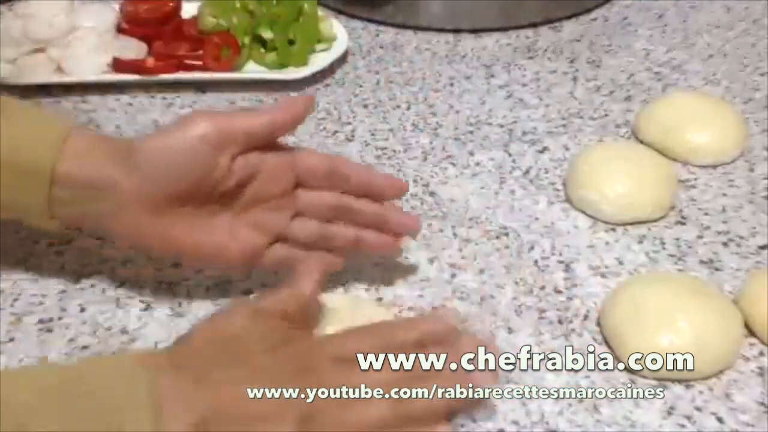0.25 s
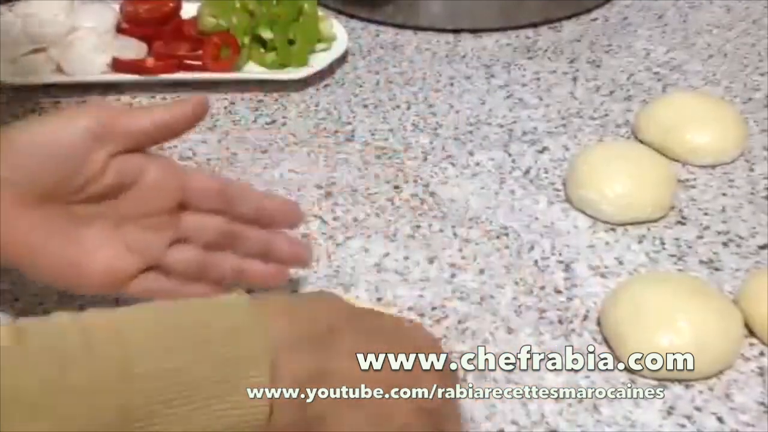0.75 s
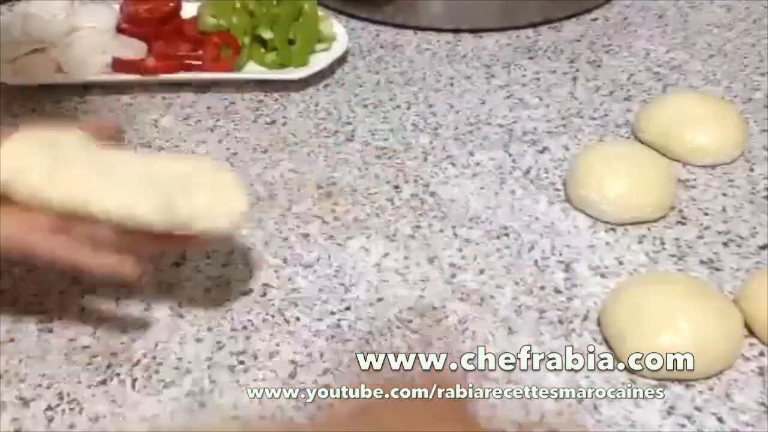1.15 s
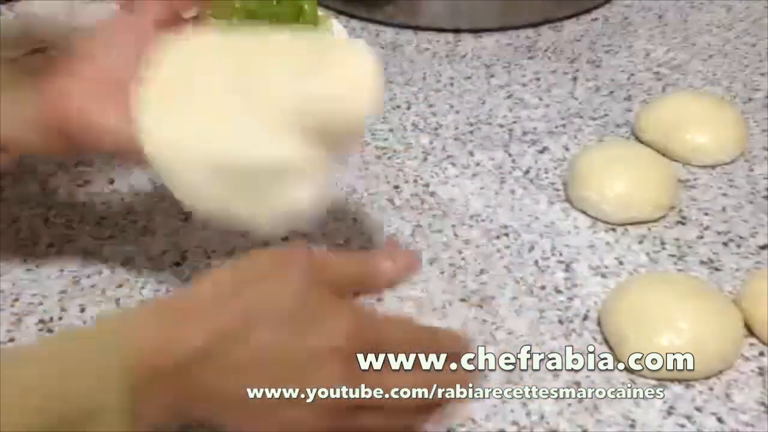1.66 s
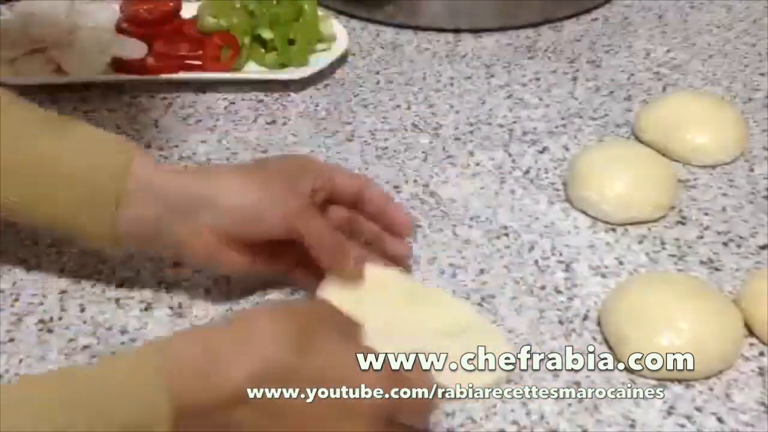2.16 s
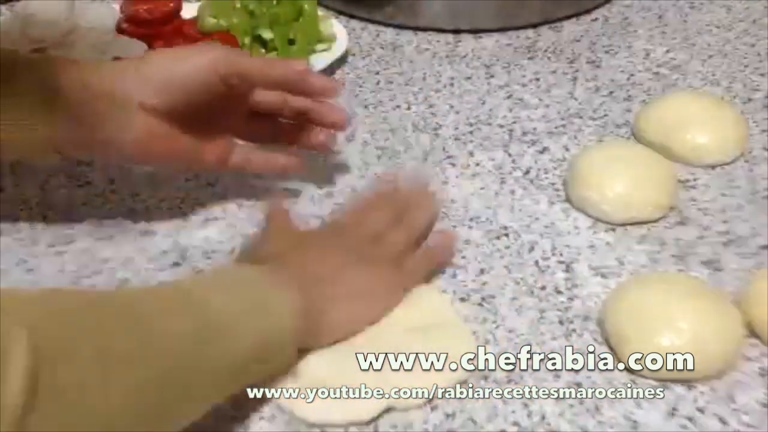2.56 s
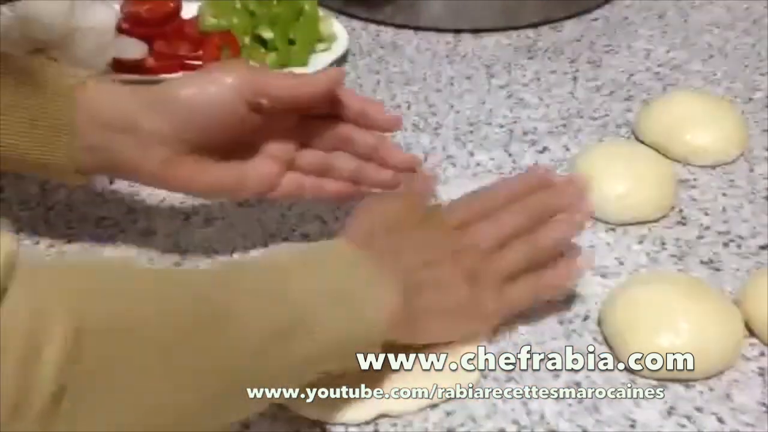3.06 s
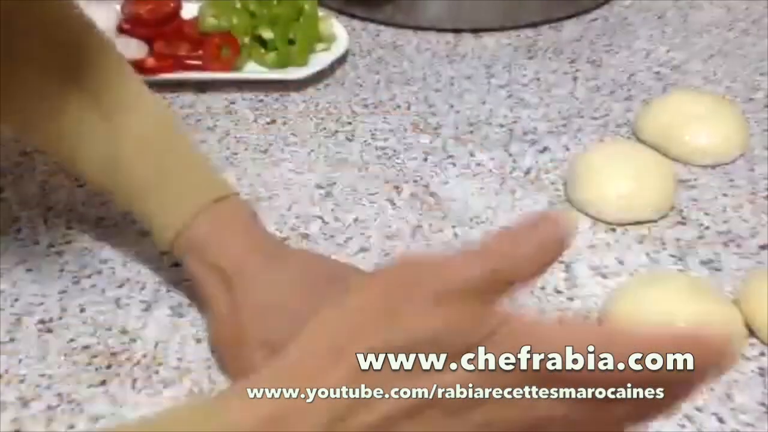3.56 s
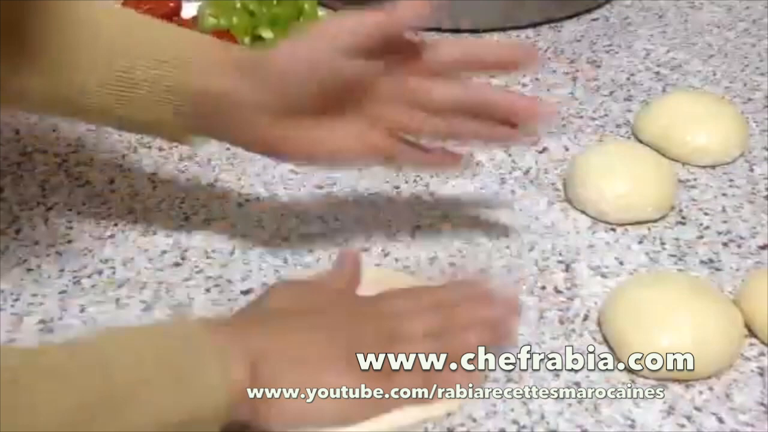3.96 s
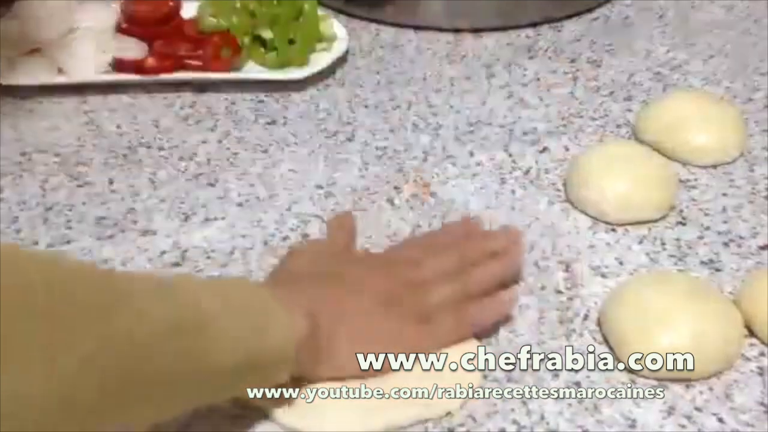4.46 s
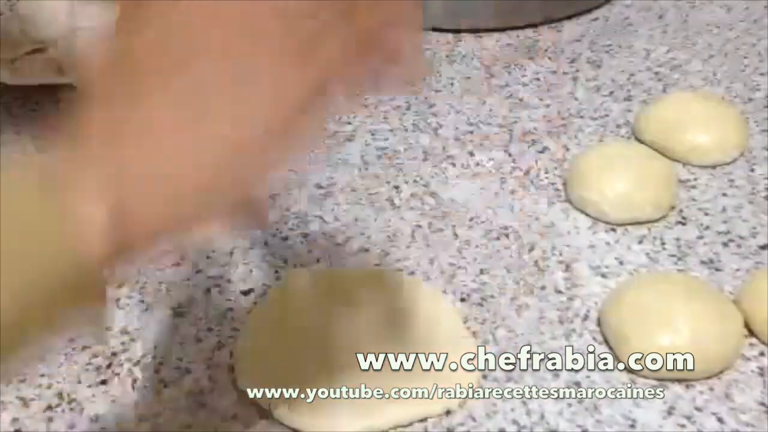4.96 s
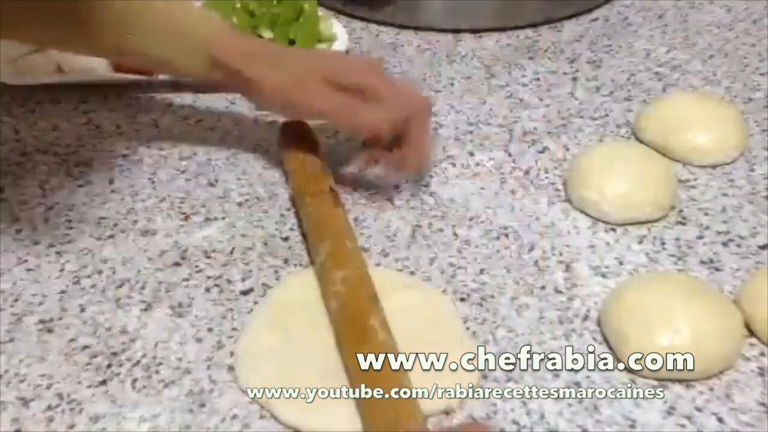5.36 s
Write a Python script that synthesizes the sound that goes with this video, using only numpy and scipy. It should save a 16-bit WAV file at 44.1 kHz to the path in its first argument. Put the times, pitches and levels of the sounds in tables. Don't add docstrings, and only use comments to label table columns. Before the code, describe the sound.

Bare hands work dough on a stone counter: a few fleshy pats, one sharp crack, then dry floury hissing during a toss. Quick light claps lead into four steady flat slaps with sticky snaps, a brief lull, and two hardest blows that overload the close microphone. A dish rings faintly; low wood scuffs and rubbing finish over quiet room hiss.

```python
import sys
import numpy as np
from scipy import signal
from scipy.fft import rfft, irfft, next_fast_len
from scipy.io import wavfile
from scipy.ndimage import map_coordinates

SR = 44100
rng = np.random.default_rng(int(sys.argv[2]) if len(sys.argv) > 2 else 0)


def amplitude_ratio(level_db):
    exponent = np.asarray(level_db, float) / 20
    return 10 ** exponent


def master_out(mix):
    frames = np.transpose(np.atleast_2d(mix))
    ceiling = np.clip(frames, -1, 1)
    pcm = np.round(ceiling * 32767).astype(np.int16)
    wavfile.write(sys.argv[1], SR, pcm)


N = 246848


def unit(x):
    return x / np.sqrt(np.mean(x ** 2) + 1e-20)


def along(points, hz):
    f, v = np.transpose(points)
    return np.interp(np.log(hz + 1), np.log(f + 1), v)


def filtered(x, response):
    m = next_fast_len(len(x) + 8192)
    return irfft(rfft(x, m) * response(np.fft.rfftfreq(m, 1 / SR)), m)[:len(x)]


def resonance(f, hz, width):
    return 1j * f * width / (hz * hz - f * f + 1j * f * width)


def wobble(rate):
    knots = rng.standard_normal(int(N * rate / SR) + 4)
    return map_coordinates(knots, [np.arange(N) * rate / SR])


def hiss(spectrum):
    return unit(filtered(rng.standard_normal(N), lambda f: amplitude_ratio(along(spectrum, f))))


def ring(modes, t, scatter_db):
    out = np.zeros(len(t))
    for hz, db, t60 in modes:
        level = db + scatter_db * rng.normal()
        out += amplitude_ratio(level - 60 * t / t60) * np.sin(2 * np.pi * hz * t)
    return out


def burst(colour, shape):
    puff = shape * unit(filtered(rng.standard_normal(len(shape)), colour))
    click = filtered(np.arange(len(shape)) == 0, colour)
    return puff, click * np.linalg.norm(shape) / np.linalg.norm(click)


def swells(rows, extra_db=0):
    s, db, rise, fall = np.transpose(rows)[:4, :, None]
    t = np.arange(0, N + 64, 64) / SR
    away = np.abs(t - s) / np.where(t < s, rise, fall)
    gain = amplitude_ratio(db + np.reshape(extra_db, (-1, 1)) - 36.5 * away ** 1.64).sum(axis=0)
    return np.interp(np.arange(N) / SR, t, gain)


# pitch in Hz, time to fall 60 dB in seconds.
KITCHEN_DECAY = [(100, 0.7), (300, 0.47), (800, 0.44), (2000, 0.54), (5000, 0.43), (12000, 0.39)]
# pitch in Hz, level in dB.
WALL_COLOUR = [(60, -9), (110, -3.5), (400, -2), (1500, 3.5), (5000, 1.5), (14000, 0.5)]


def echo():
    hz, t, z = signal.stft(rng.standard_normal(SR), SR, nperseg=512)
    t60 = along(KITCHEN_DECAY, hz)[:, None]
    colour_db = along(WALL_COLOUR, hz) + 3 * rng.standard_normal(len(hz))
    kitchen = amplitude_ratio(-60 * t / t60)
    next_room = amplitude_ratio(-27.5 - 60 * t / (3.74 * t60))
    gain = amplitude_ratio(colour_db[:, None]) * (kitchen + next_room)
    tail = signal.istft(z * gain, SR, nperseg=512)[1]
    t = np.arange(len(tail)) / SR
    flutter = amplitude_ratio(3.4 * np.cos(2 * np.pi * t / 0.0204) * np.exp(-t / 0.04))
    build = np.clip(t / 0.0017 - 0.3, 0, 1)
    tail = tail * flutter * build
    return tail / np.linalg.norm(tail)


def add(out, s, hit, wet_db, source=None):
    sound = amplitude_ratio(wet_db) * signal.fftconvolve(hit if source is None else source, echo())
    sound[:len(hit)] += hit
    part = out[round(s * SR):][:len(sound)]
    part += sound[:len(part)]


# pitch in Hz, level in dB per Hz.
ROOM_COLOUR = [(40, -42), (80, -22), (110, -2), (200, 0), (530, -5.5), (820, -7.5), (1660, -11.5),
               (7400, -16), (16000, -20)]


def room_hiss():
    return amplitude_ratio(-54.3) * hiss(ROOM_COLOUR)


# pitch in Hz, width in Hz, level in dB.
STANDING_WAVES = [(395, 4.5, -7.5), (514, 40, -0.5), (592, 15, 7.5), (683, 150, 1), (844, 19, -4),
                  (1170, 89, -2.5)]
# pitch in Hz, level in dB, time to fall 60 dB in seconds.
CABINET_MODES = [(62.1, -2.5, 0.25), (80, 23, 0.044), (106.3, 9, 0.48)]
# pitch in Hz, level in dB, time to fall 60 dB in seconds.
SLAB_MODES = [(149, 8, 0.52), (194, 4.5, 0.15), (242, -8.5, 0.58), (283.5, -6.5, 0.47)]


def standing_waves(f):
    return 1 + sum(amplitude_ratio(db) * resonance(f, hz, width) for hz, width, db in STANDING_WAVES)


def thud(out, s, db, hz, smack_db, cabinet_db, slab_db):
    t, long = np.arange(SR // 10) / SR, np.arange(SR * 3 // 4) / SR
    rise = 1 - np.exp(-t / 0.00069)
    fade_db = 60 * (t * hz / 9) ** 1.51
    pocket = -rise * np.sin(2 * np.pi * hz * t) * amplitude_ratio(db + 3 - fade_db)
    smack = rise * amplitude_ratio(smack_db + 6.5 - 60 * t / 0.037)
    puff, click = burst(lambda f: resonance(f, 397, 687) ** 2, smack)
    add(out, s, pocket + puff, wet_db=-1.5, source=pocket + filtered(click, standing_waves))
    boom = amplitude_ratio(cabinet_db) * ring(CABINET_MODES, long, scatter_db=-1.5)
    boom += amplitude_ratio(slab_db) * ring(SLAB_MODES, long, scatter_db=3.5)
    part = out[round(s * SR):][:len(long)]
    part += (boom * (1 - np.exp(-long / 0.0068)))[:len(part)]


# start in seconds, thud peak in dB, air pocket in Hz, smack in dB, boom in dB.
PALM_PATS = [(0.0, -46.5, 234, -47.5, -59.5), (0.147, -27.5, 323, -31, -38),
             (0.414, -13, 294, -24.5, -40.5), (0.652, -14, 271, -32.5, -44.5),
             (0.898, -44, 278, -50.5, -71), (1.233, -35, 256, -46, -50), (1.462, -28, 250, -33.5, -35),
             (1.87, -31.5, 317, -40.5, -68), (1.891, -29.5, 292, -32, -51), (1.916, -27, 304, -31.5, -48.5),
             (2.039, -34.5, 242, -66, -62.5), (3.524, -36, 193, -33, -38), (3.779, -51, 197, -54, -84),
             (5.312, -60, 242, -48.5, -48), (5.578, -73, 209, -76, -68)]


def palm_pats():
    out = np.zeros(N)
    for s, db, hz, smack_db, boom_db in PALM_PATS:
        thud(out, s, db, hz, smack_db, boom_db, boom_db + 1)
    return out


# pitch in Hz, level in dB.
DULL_RUB = [(500, -24.5), (1200, -16), (3000, -8.5), (5500, -13.5), (9000, -15.5), (16000, -32.5)]
BRIGHT_RUB = [(2500, -25), (5000, -3), (7500, -3.5), (11000, -7.5), (16000, -7)]
# peak time in seconds, level in dB, rise in seconds,
# fall in seconds, brightness in dB of the top over the middle.
STROKES = [(0.0, -52, .05, .12, -8), (.084, -53.5, .05, 0.036, 1.5), (.135, -52, .03, .1, 1.5),
           (.366, -59, .1, 0.014, 10.5), (.676, -54.5, .025, 0.074, 18), (.74, -57.5, .15, 0.48, 9.5),
           (1.0, -42, .17, 0.25, -7.5), (1.25, -47.5, 0.015, .13, 10), (1.313, -33, 0.1, 0.2, 6),
           (1.472, -46.5, 0.02, 0.23, 6), (1.569, -32, .17, 0.27, 5), (1.87, -54, .2, 0.46, 8),
           (2.012, -68, .15, 0.42, 9.5), (2.1, -58, .08, 0.18, 8.5), (2.189, -50, .05, 0.28, 2.5),
           (2.32, -52, .04, 0.21, 12), (2.39, -63, .08, 0.11, 9), (3.358, -56.5, .1, .15, 2),
           (3.56, -68, .06, 0.39, 8), (3.788, -50.5, .15, .16, -5.5), (4.6, -49.5, .4, 0.065, -1.5),
           (4.96, -63, .07, 0.25, 7), (5.1, -51, .25, 0.23, -10), (5.268, -57, .12, .13, -8)]


def rubs():
    brightness_db = np.transpose(STROKES)[-1]
    dull = amplitude_ratio(-5) * swells(STROKES) * hiss(DULL_RUB)
    bright = amplitude_ratio(-4) * swells(STROKES, brightness_db) * hiss(BRIGHT_RUB)
    grain = amplitude_ratio(0.84 * wobble(54) + 0.75 * wobble(400))
    return grain * (dull + bright)


def slap(out, s, db, hz, width, length, wet_db):
    t = np.arange(SR // 20) / SR
    shape = amplitude_ratio(db - 4) * (1 - np.exp(-t / 0.00046)) * np.exp(-t / max(length, 5e-4) * 2)
    crack, click = burst(lambda f: 0.034 * resonance(f, 4100, 14000) + resonance(f, hz, width) ** 2, shape)
    snap = np.exp(-(length / 0.0025) ** 2)
    add(out, s, snap * click + (1 - snap) * crack, wet_db, source=click)


# start in seconds, peak in dB, centre in Hz, length in seconds.
TOUCHES = [(0.143, -37.5, 5970, .0074), (0.149, -29.5, 8400, .0054), (.401, -31.5, 3700, .012),
           (0.649, -21.5, 6500, .0027), (1.232, -26.5, 6200, .004), (1.458, -26, 6200, .006),
           (1.892, -28.5, 12100, .011), (2.296, -34, 4000, .006), (2.5847, -20.5, 4000, .006),
           (2.594, -12.5, 5900, .003), (2.89, -17.5, 4630, .003), (2.897, -21.5, 6000, .006),
           (3.1713, -24, 7000, .005), (3.176, -20, 7100, .002), (3.525, -21.5, 2780, .005),
           (3.526, -34, 11400, .01), (4.0035, -17, 3480, .008), (4.393, -22, 1970, .008),
           (4.396, -15, 4040, .004), (5.015, -35.5, 10630, .006)]


def touches():
    out = np.zeros(N)
    for s, db, hz, length in TOUCHES:
        slap(out, s, db, hz, 8700, length, wet_db=2)
    return out


# start in seconds, peak in dB, centre in Hz, length in seconds, echo in dB.
CRACKS = [(0.147, -24.5, 2390, 0.0041, 3), (0.413, -5.5, 3730, 0.0021, -5),
          (1.89, -12.5, 3550, 0.0011, 0.5), (1.9173, -17.5, 5370, .004, -4.5),
          (2.305, -17.5, 4000, 0.0028, -3.5), (2.587, -9, 1980, 0.0075, -3),
          (2.895, -19.5, 1400, 0.0057, 0), (3.168, -17, 1300, 0.0031, 0.5), (4.006, -0.5, 2560, 0.0032, 0),
          (4.397, 4, 2180, 0.0018, -15), (5.314, -34, 1000, .004, -13)]


def cracks():
    out = np.zeros(N)
    for s, db, hz, length, wet_db in CRACKS:
        slap(out, s, db, hz, 2960, length, wet_db)
    return out


# start in seconds, peak in dB, pitch in Hz, echo in dB.
POPS = [(.1503, -28, 530, 9), (0.4152, -29.5, 475, 10.5), (0.4158, -28.5, 640, 7), (1.4602, -29, 780, 3),
        (1.9182, -24, 950, -1), (2.5886, -14.5, 2330, -10), (2.5962, -8, 414, -3.5),
        (2.8961, -15.5, 2140, 3.5), (2.9203, -13.5, 870, -5.5), (3.1714, -15, 2150, 1.5),
        (3.1976, -16, 910, -9), (4.0076, -6.5, 1620, -6.5), (4.0092, -8.5, 620, 6), (4.4003, -17, 480, 4),
        (5.0162, -37.5, 750, -3)]


def pops():
    out = np.zeros(N)
    for s, db, hz, wet_db in POPS:
        slap(out, s, db, hz, 0.35 * hz, 7.1 / hz, wet_db)
    return out


# start in seconds, thud peak in dB, air pocket in Hz, heel in dB, boom in dB.
FLAT_PATS = [
    (2.3, -30, 284, -30.5, -53.5),
    (2.593, -9.5, 289, -10.5, -29.5),
    (2.9, -14.5, 324, -14.5, -30.5),
    (3.175, -18.5, 328, -17.5, -31.5),
    (4.007, 2.1, 301, -6.5, -29.5),
    (4.399, -4, 267.5, -15.5, -29.5),
]


def flat_pats():
    out, heel_delay_s = np.zeros(N), 0.0202
    for s, db, hz, heel_db, boom_db in FLAT_PATS:
        thud(out, s, db, hz, db - 9.5, boom_db, boom_db - 7)
        thud(out, s + heel_delay_s, heel_db, 229, heel_db - 9.5, boom_db - 18.5, boom_db - 1.5)
    return out


# start in seconds, peak in dB, centre in Hz.
TICKS = [
    (2.309, -21, 6000),
    (2.654, -13, 5840),
    (2.918, -22, 7340),
    (2.956, -17, 5400),
    (3.196, -29, 8860),
    (3.22, -28, 6460),
    (3.232, -18, 5360),
    (3.271, -30.5, 5000),
]


def ticks():
    out = np.zeros(N)
    for s, db, hz in TICKS:
        slap(out, s, db, hz, 2200, 0.0021, wet_db=-10)
    return out


# start in seconds, level in dB.
CLINKS = [
    (4.0305, -21),
    (4.038, -26),
    (4.068, -30),
    (4.411, -40),
]
# pitch in Hz, level in dB, time to fall 60 dB in seconds.
DISH_MODES = [(4689, -3, .18), (4770, -6, .2), (4835, 2.5, .45), (4872, -2.5, .38), (4958, -8, .25),
              (6708, -22, .15), (10420, -22, .05), (11130, -19, .05)]


def dish():
    out, t = np.zeros(N), np.arange(SR // 3) / SR
    strike = (1 + 3 * np.exp(-t / 0.004)) / 4
    for s, db in CLINKS:
        add(out, s, amplitude_ratio(db) * strike * ring(DISH_MODES, t, scatter_db=1.5), wet_db=-3)
    return out


# pitch in Hz, level in dB.
DRAG_COLOUR = [(70, -40), (130, 5), (250, -2), (700, -2), (1500, -6), (4000, -25)]
# peak time in seconds, level in dB, rise in seconds, fall in seconds.
SCUFFS = [
    (4.78, -64, 0.04, 0.23),
    (4.93, -76, .04, .1),
    (5.016, -58, .015, .05),
    (5.14, -56, 0.15, .3),
    (5.3, -68, .03, .03),
]


def drag():
    return swells(SCUFFS) * amplitude_ratio(3.2 * wobble(30)) * hiss(DRAG_COLOUR)


# pitch in Hz, width in Hz, level in dB.
PIN_MODES = [(1730, 70, 1), (2995, 56, 0.6), (4370, 90, -1), (5990, 100, -3), (7770, 200, -10),
             (10400, 700, -3), (12400, 800, -0.5)]
# peak time in seconds, middle mode in dB, rise in seconds,
# fall in seconds, upper modes over the middle one in dB.
GRIPS = [
    (4.962, -68.5, 0.097, 0.09, 7.5),
    (5.02, -55, 0.084, 0.084, -4),
    (5.08, -59, .08, .2, -6),
    (5.265, -61, .04, .2, -2),
]


def pin():
    lowest, middle = swells(GRIPS, -3.5), swells(GRIPS)
    upper = swells(GRIPS, np.transpose(GRIPS)[-1])
    grips = [lowest, middle] + [upper] * (len(PIN_MODES) - 2)
    out, slips_db = np.zeros(N), 3 * wobble(70)
    for (hz, width, db), grip in zip(PIN_MODES, grips):
        mode = unit(filtered(rng.standard_normal(N), lambda f: resonance(f, hz, width)))
        out += mode * grip * amplitude_ratio(db + slips_db + 2.1 * wobble(40))
    return out


# start in seconds, peak in dB.
SQUEAKS = [
    (5.51, -59),
    (5.55, -57),
    (5.572, -56),
]


def squeaks():
    out = np.zeros(N)
    for s, db in SQUEAKS:
        slap(out, s, db, 6200, 900, 0.048, wet_db=-1.5)
    return out


def scene():
    thuds = palm_pats() + flat_pats()
    slaps = touches() + cracks() + pops() + ticks() + squeaks()
    sliding = rubs() + drag() + pin()
    return (room_hiss() + thuds + slaps + sliding + dish())[None]


def roll_off(x):
    return signal.sosfilt(signal.butter(12, 16230, fs=SR, output="sos"), x)


def record(dry):
    microphone = lambda f: (1j * f / (1j * f + 70)) ** 2 * (f < 15000)
    clipped = np.clip(filtered(dry[0], microphone), -1, 1)
    return roll_off(clipped[None])


dry = scene()
out = record(dry)
master_out(out)
```